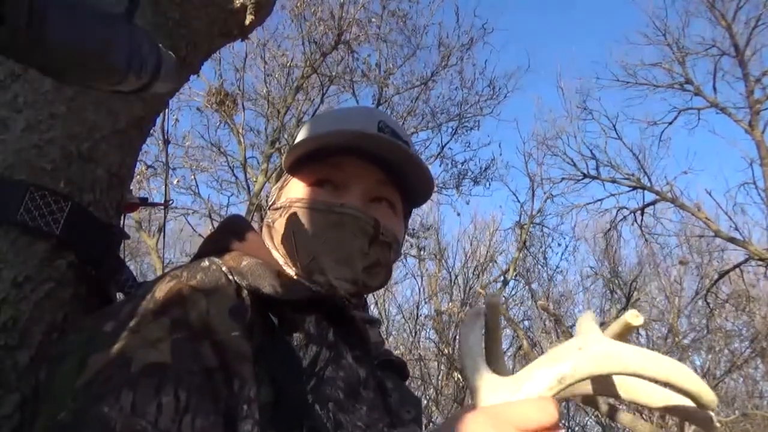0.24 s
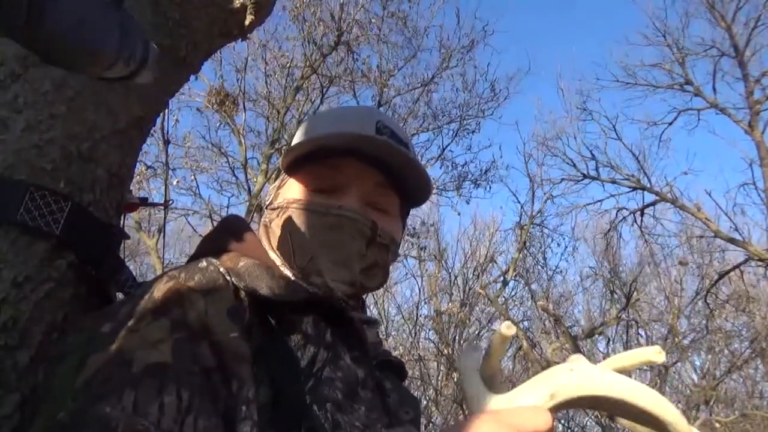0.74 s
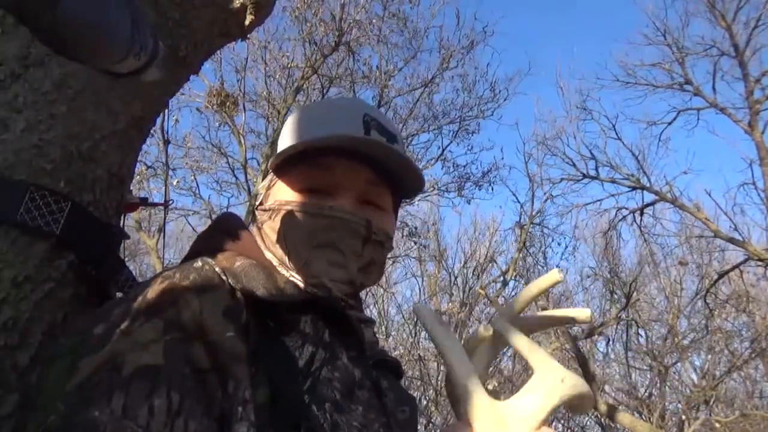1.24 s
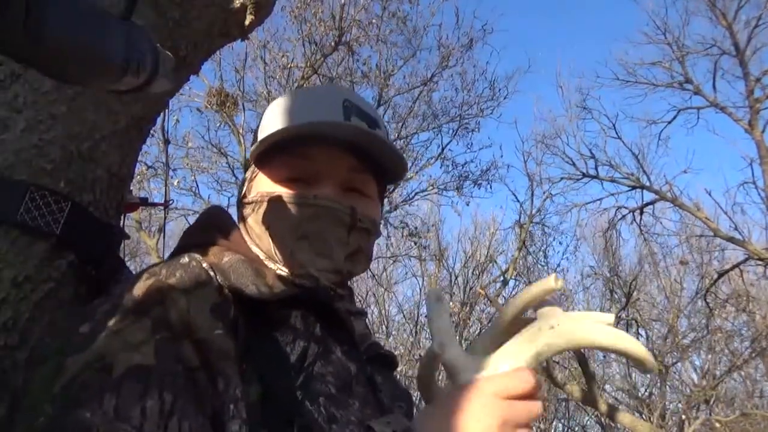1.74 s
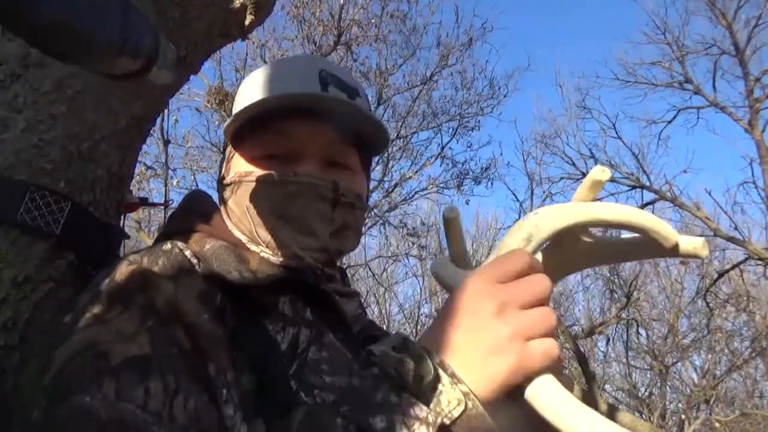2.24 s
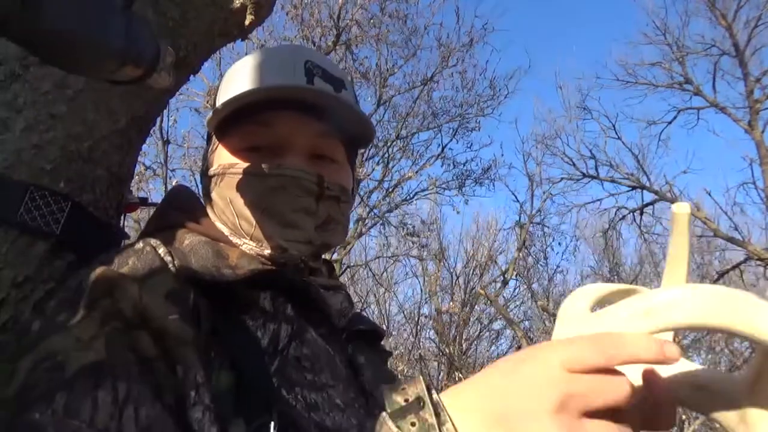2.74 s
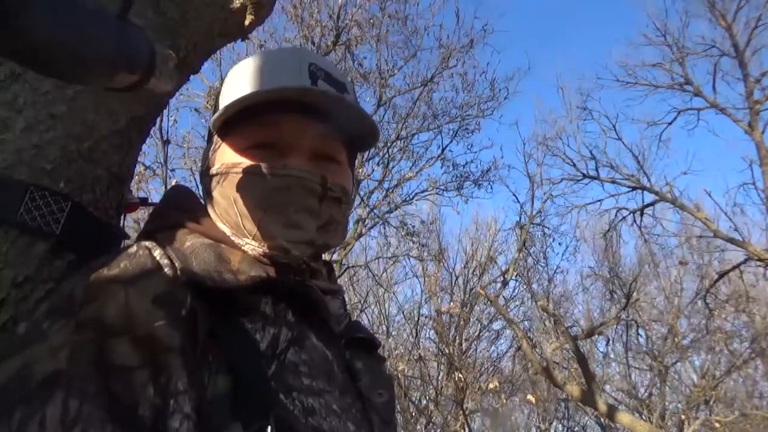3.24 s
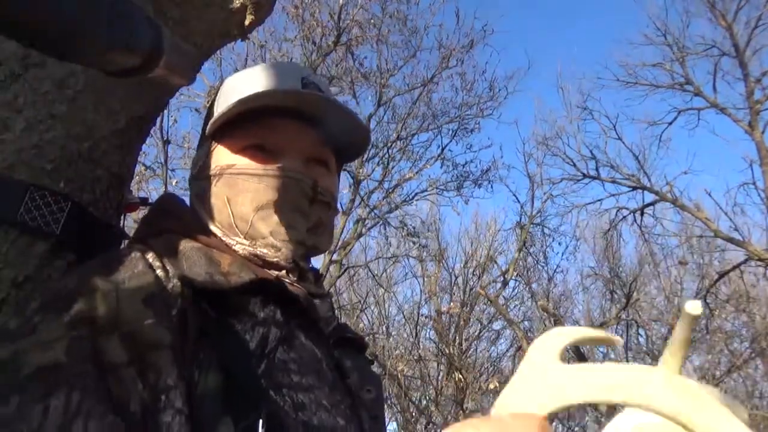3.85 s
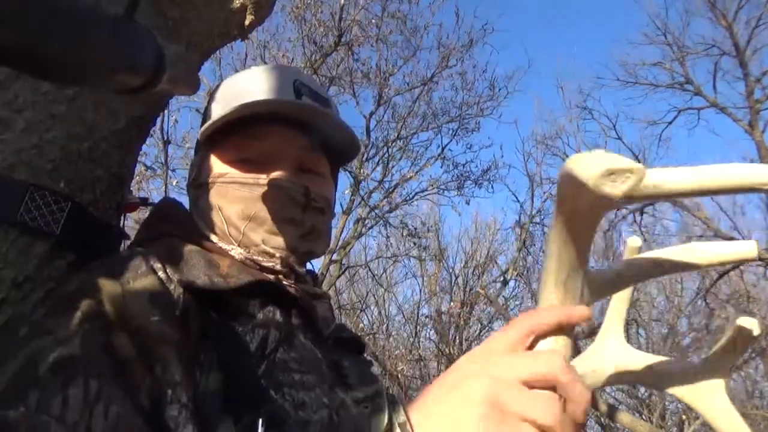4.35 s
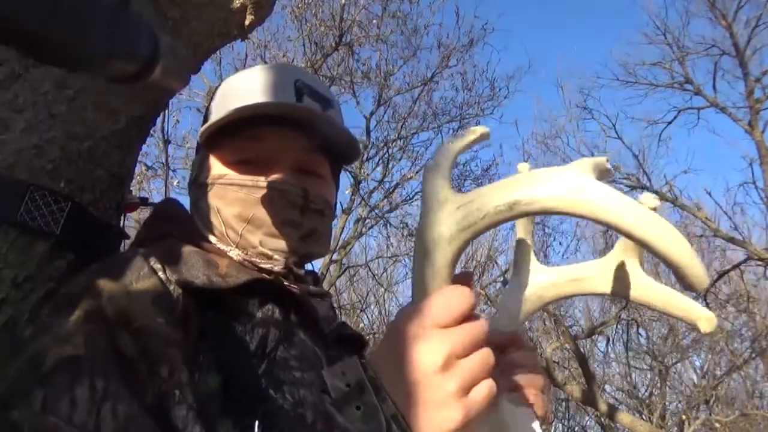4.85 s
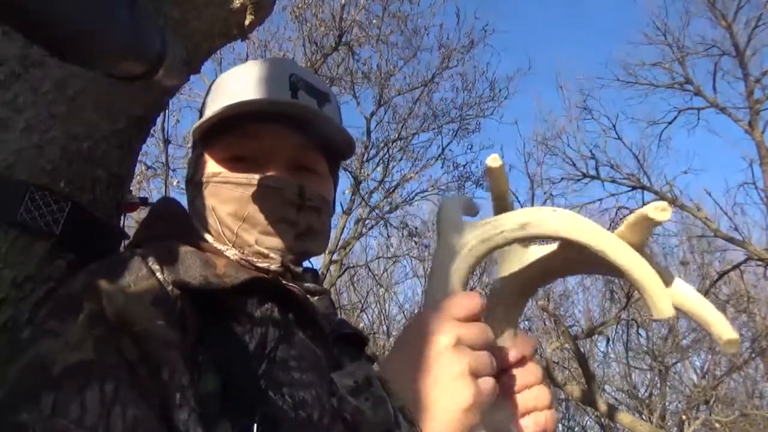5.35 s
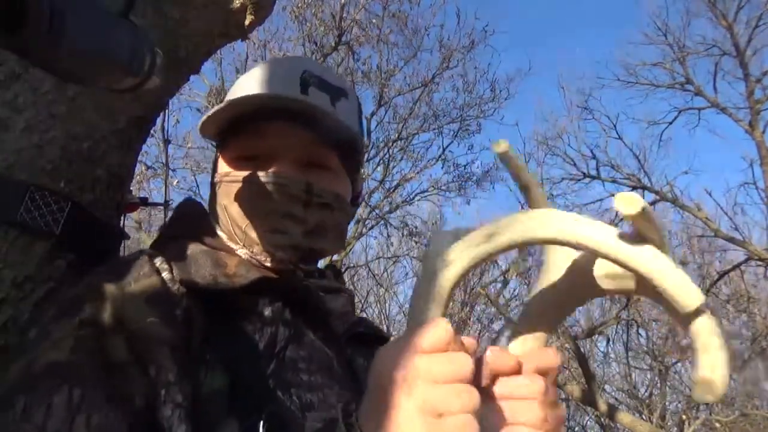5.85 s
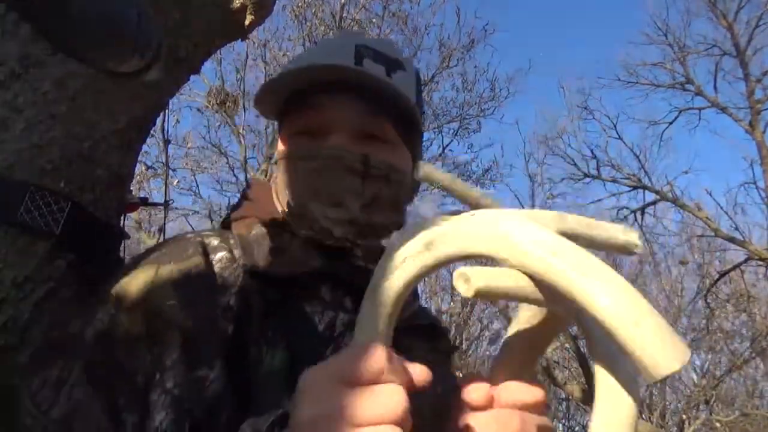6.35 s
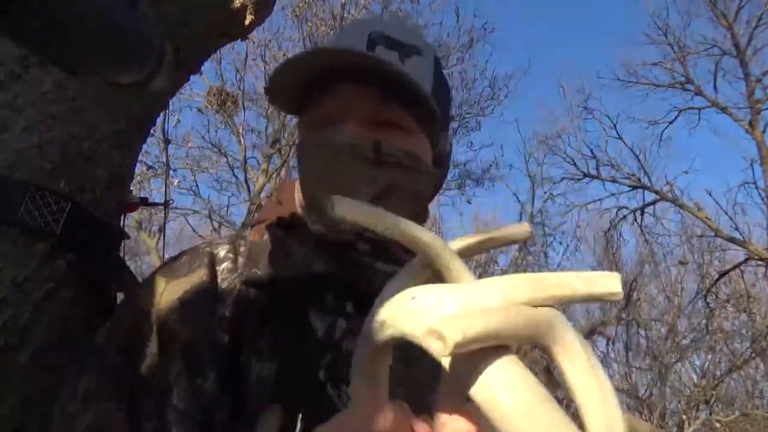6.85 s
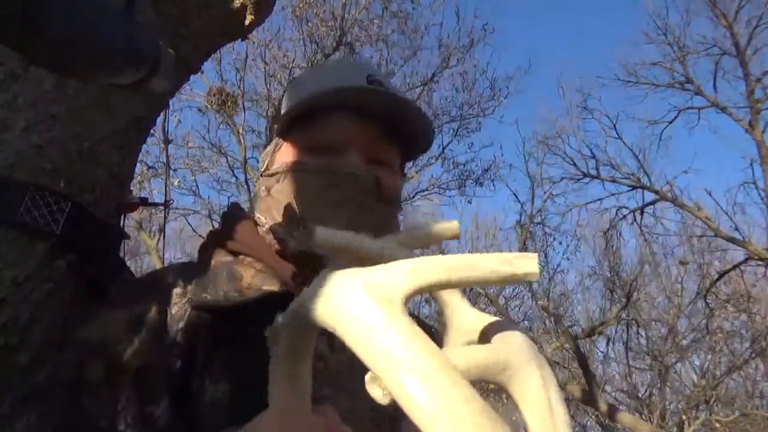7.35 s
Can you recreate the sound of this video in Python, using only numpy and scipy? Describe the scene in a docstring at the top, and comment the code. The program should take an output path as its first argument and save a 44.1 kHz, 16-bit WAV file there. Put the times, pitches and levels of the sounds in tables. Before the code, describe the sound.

Outdoors among bare trees, hard antlers strike with bright, dry, hollow clacks, slightly right of centre and very near. Contacts bounce in twos and threes, then in longer rattling runs, with brief rasps as the beams slide. Jacket cloth brushes quietly and air stirs faintly. The middle thins to small ticks, then the clashing returns strongly, with only a thin woodland tail.

```python
"""Soft air and a jacket sleeve come first, then a faint clack: two deer antlers, close to a stereo microphone
in a quiet winter wood. Clashed by hand, they ring as bending modes plus a short noise crack at each contact.
Volleys bounce out or are pressed on as the contact point slides; trains of tiny slips make the beams scrape.
Filtered noise gives the light ticks, the cloth and the air, and the trees' faint answer is a decaying noise tail.
The camera's limiter flattens the hardest blows."""
import sys
import numpy as np
from scipy import signal
from scipy.fft import rfft, irfft, next_fast_len
from scipy.io import wavfile
from scipy.ndimage import uniform_filter1d, minimum_filter1d, map_coordinates

SR = 44100
rng = np.random.default_rng(int(sys.argv[2]) if len(sys.argv) > 2 else 0)


def dump_mix(stems):
    """Bounce the given channels to the path in sys.argv[1] as a 16-bit WAV at rate SR."""
    frames = np.atleast_2d(stems).T  # one column per channel
    limited = np.clip(frames, -1, 1)  # hard clip at full scale
    pcm = np.round(limited * 32767).astype(np.int16)
    wavfile.write(sys.argv[1], SR, pcm)


N = 335601
TIME = np.arange(N) / SR
RING_TIME = np.arange(SR // 4) / SR

# Levels of events, sleeves and air are before the gain_db of their function.
# Low stir of air in the wood. Each row: time in seconds, level in dB.
AIR_LEVEL = [(0, -58), (.25, -65.5), (.9, -62), (1.3, -55.5), (1.6, -55), (2.05, -65), (2.9, -65),
             (3.05, -60.5), (3.85, -64), (3.96, -58.5), (4.1, -64.5), (7.61, -65)]
# Jacket sleeves. Each row: time in seconds, level in dB.
SLEEVE_LEVEL = [(0, -60), (1.8, -55.5), (2.1, -54.5), (3.2, -55.5), (3.7, -50), (4.2, -56), (5.55, -56),
                (5.85, -54), (6.5, -48), (6.78, -52), (7.61, -59.5)]
# Colour of the air. Each row: frequency in Hz, relative density in dB per Hz.
AIR_COLOUR = [(25, -15), (130, -4), (250, -4.5), (2000, -11.5), (8000, -24)]
# Colour of the cloth. Each row: frequency in Hz, relative density in dB per Hz.
CLOTH_COLOUR = [(100, -47), (400, 3.5), (1000, 4), (3000, 2.5), (5500, 2), (8000, 4.5), (10800, -4)]
# Bending modes of the pair. Each row: frequency in Hz, relative level in dB.
BENDING_MODES = [(350, -12), (431, -18), (624, -9.5), (802, -10), (915, -11.5), (1145, 0), (1335, -1),
                 (1529, -2.5), (1770, 4.5), (1845, -4), (2137, -0.5), (2315, 7.5), (2700, -2), (3040, 6.5),
                 (3400, 3.5), (3640, 9), (3828, 6.5), (4170, 10.5), (4480, 7.5), (4940, 2), (5460, 8.5),
                 (5950, 5), (6560, 3), (7210, 9.5), (7780, 5.5), (8500, -12.5), (9400, -19)]
# Each new hold leaves one low mode free to ring. Each row: start in seconds, free mode in Hz.
HOLDS = [(0, 936), (.9, 1246), (1.7, 1145), (2.1, 890), (2.6, 363), (3.5, 624), (5, 880), (6.7, 624)]
# Blows timed one by one, some alone, some in close pairs or just after a volley. Each row: start in seconds,
# level in dB, mode favoured by the contact point in Hz, beam knock in dB re level, tine snap in dB re level.
SINGLE_BLOWS = [(0.177, -46, 1620, -6, -17), (0.552, -25, 1560, -14, -13), (1.363, -26, 2800, -24, -14),
                (1.758, -20, 2610, -13.5, 0), (2.037, -19, 3010, -12, -39),
                (2.389, -15.5, 3290, -24.5, -44), (2.458, -42.5, 3130, -15, -16),
                (2.578, -37, 1650, -33, -28), (2.634, -34, 3000, -23, -5), (2.772, -33.5, 3000, -9, -20),
                (2.805, -21, 3100, -19.5, -30), (3.044, -39, 2090, -5, 7.5), (3.393, -42, 3100, -5.5, -16),
                (3.419, -34.5, 3020, -24, 1), (3.59, -31, 3500, -42, -0.5), (3.603, -30.5, 1630, -6, -3),
                (4.207, -18, 2870, -13.5, -42), (5.334, -33, 2740, -21, -30),
                (5.741, -34.5, 1930, -7.5, -12), (5.781, -37.5, 3190, -11, -15),
                (5.858, -23.5, 2530, -20, -14), (5.876, -17.5, 2010, -17, -14.5),
                (5.952, -28.5, 2140, -27, -18), (5.966, -21, 1840, -16, -26), (6.599, -33, 2270, -21, -11),
                (6.795, -18.5, 2400, -19, 1), (6.954, -22, 1944, -18, -13), (7.391, -30, 2580, -10.5, -9)]
# A clash rattles as a volley of contacts. Each row: first contact in seconds, last contact in seconds,
# number of contacts, level in dB, first favoured mode in Hz, last favoured mode in Hz,
# beam knock in dB re level, tine snap in dB re level.
CLASH_VOLLEYS = [(0.247, 0.305, 6, -38, 2300, 1510, -24, -21),
                 (0.483, 0.525, 3, -14, 4150, 3120, -19.5, -6.5),
                 (0.946, 0.968, 2, -16, 3020, 3280, -17.5, -37),
                 (1.201, 1.229, 3, -20.5, 3820, 2590, -18, -6), (1.325, 1.349, 2, -17, 4500, 4130, -35, -1),
                 (1.409, 1.429, 3, -18, 3920, 1710, -15.5, -8.5),
                 (1.569, 1.598, 3, -21, 2450, 2060, -20, -1.5),
                 (1.79, 1.857, 5, -17, 3460, 3150, -24.5, -3),
                 (2.18, 2.201, 3, -17.5, 3510, 2630, -14, -4.5),
                 (2.22, 2.277, 4, -16, 3130, 3340, -15.5, -11),
                 (2.7, 2.735, 3, -18, 2950, 3120, -20.5, -14),
                 (3.06, 3.084, 3, -22.5, 1550, 1840, -5, -7.5),
                 (5.156, 5.205, 5, -19.5, 3230, 2890, -18.5, -2.5),
                 (5.593, 5.676, 6, -18.5, 4200, 3010, -25, -0.5),
                 (6.024, 6.134, 9, -19.5, 4440, 2520, -32, -3.5),
                 (6.257, 6.332, 6, -18.5, 2880, 2450, -27, -4.5),
                 (6.823, 6.869, 4, -10.5, 4460, 1920, -24.5, -3),
                 (7.207, 7.303, 7, -16, 1960, 2340, -20.5, -4)]
# One knobbly beam slides along the other. Each row: start in seconds, end in seconds, level in dB,
# centre of the rasp in Hz.
BEAM_SCRAPES = [(0.262, 0.399, -46.5, 3020), (0.411, 0.51, -37, 3170), (0.488, 0.567, -28, 1590),
                (0.634, 0.636, -41, 1240), (0.894, 0.937, -47, 3000), (0.974, 1.001, -30.5, 3200),
                (1.255, 1.288, -45, 2200), (1.372, 1.401, -33, 2720), (1.439, 1.524, -31.5, 1980),
                (1.763, 1.896, -27, 1620), (1.903, 2.002, -39.5, 3330), (2.292, 2.435, -36.5, 1930),
                (2.607, 2.67, -44, 1750), (3.084, 3.122, -38.5, 1150), (3.091, 3.157, -44.5, 377),
                (3.452, 3.489, -35.5, 3210), (5.378, 5.452, -45, 8000), (5.826, 5.929, -35, 1940),
                (5.971, 6.005, -39, 1930), (6.141, 6.157, -31.5, 3070), (6.402, 6.48, -45.5, 2200),
                (6.592, 6.627, -33.5, 1680), (6.858, 6.893, -24.5, 2300)]
# How long the trees answer. Each row: frequency in Hz, time to fall 60 dB in seconds.
WOODS_DECAY = [(200, 0.18), (3000, 0.75), (10000, 0.48)]
# Light dry ticks. Each row: start in seconds, level in dB.
LIGHT_TICKS = [(2.921, -31), (3.749, -30), (3.814, -27), (3.827, -37), (3.87, -36), (4.868, -30),
               (4.894, -41), (4.901, -28.5), (4.946, -34), (4.961, -27.5), (5.013, -37.5), (5.047, -40.5)]
# Colour of the ticks. Each row: frequency in Hz, relative density in dB per Hz.
TICK_NOISE_COLOUR = [(200, -6), (1000, 0.5), (8000, 21)]

# The beams knock below the first pitch, the tines snap above the second.
KNOCK_HZ, SNAP_HZ = 1400, 4700
# A blow with more knock than usual also drives the modes up to TINE_HZ (spill in dB per dB of extra knock).
USUAL_KNOCK_DB, KNOCK_SPILL, TINE_HZ = -25, 0.42, 2330
# Up to LOOSE_COUNT contacts bounce freely, more are pressed on.
# Each pair: pace (under 1 the gaps shrink), loss by the last contact in dB.
LOOSE_COUNT = 3
LOOSE, PRESSED = (0.8, 5.7), (1.05, 3.14)
# Scatter of the inner contacts: share of an even gap, dB, share of the pitch.
UNEVEN_GAP, UNEVEN_DB, UNEVEN_SPOT = 0.14, 0.3, 0.11
SNAP_FALL_DB = 8.5  # over a volley, as the contact slides from the tines to the beams
TOP_HZ = 10950  # top of the recorded band


def amp(db):
    """Decibels to gain."""
    return 10 ** (np.asarray(db) / 20)


def unit(x):
    """Scale to rms 1."""
    return x / np.sqrt(np.mean(x ** 2) + 1e-20)


def along(points, hz):
    """Read (Hz, value) points on a log frequency axis."""
    point_hz, value = np.transpose(points)
    return np.interp(np.log(hz + 1), np.log(point_hz), value)


def filtered(x, response):
    """x times a response of frequency, padded so that the end does not wrap round."""
    size = x.shape[-1]
    padded = next_fast_len(size + 4096)
    spectrum = rfft(x, padded) * response(np.fft.rfftfreq(padded, 1 / SR))
    return irfft(spectrum, padded)[..., :size]


def two_ports(size, width):
    """Random values for left and right: a shared part and a part of opposite sign."""
    mid, side = rng.standard_normal((2, size))
    return np.array([mid + width * side, mid - width * side])


def noise(colour, size, width):
    """Coloured stereo noise of rms 1."""
    return unit(filtered(two_ports(size, width), lambda hz: amp(along(colour, hz))))


def wobble(rate):
    """A smooth random curve, rate knots a second."""
    knots = rng.standard_normal(int(N * rate / SR) + 4)
    return map_coordinates(knots, [TIME * rate])


def add(track, s, sound):
    """Mix a sound into a track at time s."""
    part = track[:, max(round(s * SR), 0):]
    part[:, :sound.shape[1]] += sound[:, :part.shape[1]]


def breeze(gain_db=1, flutter_db=4.55):
    """Light air rumbles softly round the tree: dark noise whose level wanders slowly."""
    level_db = np.interp(TIME, *np.transpose(AIR_LEVEL))
    return amp(level_db + gain_db + flutter_db * wobble(4.46)) * noise(AIR_COLOUR, N, width=0.32)


def jacket(gain_db=4, flutter_db=1.57):
    """Sleeves brush the body as the arms move: noise with a quick flutter."""
    level_db = np.interp(TIME, *np.transpose(SLEEVE_LEVEL))
    return amp(level_db + gain_db + flutter_db * wobble(45)) * noise(CLOTH_COLOUR, N, width=0.33)


def grip(free_hz, free_db=11, detune=0.014, scatter_db=5.0):
    """The modes (Hz, dB) under one hold: the hands shift and damp each differently, sparing the free one."""
    hz, db = np.transpose(BENDING_MODES)
    shift, damp = rng.standard_normal((2, len(hz)))
    free = np.exp(-.5 * (np.log(hz / free_hz) / 0.044) ** 2)
    held_hz = hz * (1 + detune * shift * (1 - free))
    held_db = db + scatter_db * damp * (1 - free) + free_db * free
    return held_hz, held_db


def held(grips, s):
    """The modes of the hold in use at time s."""
    return grips[max(np.searchsorted(np.transpose(HOLDS)[0], s) - 1, 0)]


def contacts():
    """Every contact, single or in a volley; along a volley blows weaken and lose snap as the contact slides."""
    rows = list(SINGLE_BLOWS)
    for first, last, count, db, first_hz, last_hz, knock_db, snap_db in CLASH_VOLLEYS:
        pace, loss_db = LOOSE if count <= LOOSE_COUNT else PRESSED
        # the first and last contacts are not scattered
        early, force, spot = np.pad(rng.standard_normal((3, count - 2)), ((0, 0), (1, 1)))
        even = (np.arange(count) + UNEVEN_GAP * early) / (count - 1)
        way = np.clip(even, 0, 1) ** pace
        starts = first + (last - first) * way
        levels_db = db - loss_db * way ** 2 + UNEVEN_DB * force
        favoured_hz = first_hz * (last_hz / first_hz) ** way * np.exp(UNEVEN_SPOT * spot)
        rows += zip(starts, levels_db, favoured_hz, np.full(count, knock_db), snap_db - SNAP_FALL_DB * way)
    return rows


def knocked(modes, knock_db):
    """The modes (Hz, dB) as one blow meets them: on the beam it drives the lower ones, on a tine it spares them."""
    hz, db = modes
    low_share = np.interp(hz, [KNOCK_HZ, TINE_HZ], [1, 0])
    return hz, db + KNOCK_SPILL * (knock_db - USUAL_KNOCK_DB) * low_share


def ring(modes, favoured_hz, favour_db, reach, t60_1khz=0.13, damping=1.0, scatter_db=3.5, detune=0.02,
         uneven=0.22):
    """The modes after one contact, (channels, modes, time); higher ones die sooner in the gripped bone."""
    hz, db = modes
    level_chance, pitch_chance, sign_chance, damp_chance = rng.standard_normal((4, len(hz)))
    favour = np.exp(-.5 * (np.log(hz / favoured_hz) / reach) ** 2)
    db = db + scatter_db * level_chance + favour_db * favour
    hz = hz * (1 + detune * pitch_chance * hz / SNAP_HZ)  # contact loads light tines more than the heavy beam
    t60 = t60_1khz * (hz / 1000) ** -damping  # seconds, before the two losses below
    t60 = t60 / (1 + (430 / hz) ** 6)  # the hands soak up the lowest modes
    t60 = t60 * np.exp(-uneven * np.abs(damp_chance))  # the touching antler damps each mode by chance
    fade = np.exp(-np.log(1000) * np.outer(1 / t60, RING_TIME).astype(np.float32))
    waves = fade * np.sin(2 * np.pi * np.outer(hz, RING_TIME).astype(np.float32))
    balance = 1 + .18 * np.outer([1, -1], rng.standard_normal(len(hz)))  # each mode leans left or right
    gains = amp(db) * np.sign(sign_chance) * balance
    return gains.astype(np.float32)[:, :, None] * waves


def head_unit(x):
    """Scale a blow to rms 1 over its first 8 ms."""
    head = int(.008 * SR)
    return x / np.sqrt(np.mean(x[:, :head] ** 2) + 1e-20)


def later(x, s):
    """The same sound s seconds later, cut to the ring length."""
    return np.pad(x, ((0, 0), (int(s * SR), 0)))[:, :len(RING_TIME)]


def clacks(grips, crack_db=-4, crack_t60=0.019, chatter=0.22, rebound=0.52, gain_db=1):
    """Each blow rings the modes and cracks at the contact; it chatters at once, then rebounds lightly."""
    out = np.zeros((2, N))
    zone = np.digitize(np.transpose(BENDING_MODES)[0], [KNOCK_HZ, SNAP_HZ])
    edges = [(580, KNOCK_HZ), (KNOCK_HZ, SNAP_HZ), (SNAP_HZ, 9500)]  # Hz: knock, clack, snap
    bands = [signal.butter(2, edge, 'band', fs=SR, output='sos') for edge in edges]
    for s, db, favoured_hz, knock_db, snap_db in contacts():
        modes = ring(knocked(held(grips, s), knock_db), favoured_hz, favour_db=18, reach=0.069)
        crack = two_ports(len(RING_TIME), width=0.28) * amp(-60 * RING_TIME / crack_t60)
        # delays in seconds, then the share of the rebound
        chatter_s, rebound_s, lift = rng.uniform([.001, .006, 0], [.003, .014, 1])
        for k, part_db in enumerate([knock_db, 0, snap_db]):
            tone = head_unit(modes[:, zone == k].sum(axis=1))
            part = tone + amp(crack_db) * head_unit(signal.sosfilt(bands[k], crack))
            part = part + chatter * later(part, chatter_s) + rebound * lift * later(part, rebound_s)
            add(out, s, amp(db + part_db + gain_db) * head_unit(part))
    return out


def slips(size, db):
    """Ridges catch and let go at an uneven pace: single ticks under light pressure, a rasp under heavy."""
    pace, force = rng.standard_normal((2, len(RING_TIME)))[:, :size]
    held_pace = np.repeat(np.clip(pace, -1.5, 1.5), 256)[:len(force)]  # a new pace every 256 samples
    slips_per_s = 170 * amp((db + 33) / 2 + 7 * held_pace)
    ridge = np.floor(np.cumsum(slips_per_s) / SR)
    blows = np.diff(ridge, prepend=-1) * amp(4.5 * np.clip(force, -2, 2))
    blows = blows + .028 * pace  # fine grain between the ridges
    return blows * signal.windows.tukey(len(blows), .2)


def scrapes(grips, grit_db=-9, reach=1.25, gain_db=0, count=5):
    """Every slip is a tiny blow at one of count spots; pressed together, the beams ring only briefly."""
    out = np.zeros((2, N))
    for start, end, db, centre_hz in BEAM_SCRAPES:
        blows = slips(max(int((end - start) * SR), SR // 100), db)
        spots = rng.integers(count, size=len(RING_TIME))[:len(blows)]
        sound = 0
        for spot in range(count):
            grit = two_ports(len(RING_TIME), width=0.46) * amp(-60 * RING_TIME / 0.01)
            modes = ring(held(grips, start), centre_hz, favour_db=14, reach=0.06, t60_1khz=0.094, detune=0.038)
            answer = unit(modes.sum(axis=1)) + amp(grit_db) * unit(grit)
            sound = sound + signal.fftconvolve([blows * (spots == spot)], answer, axes=1)
        # the size of the ridges sets which band they drive
        sound = filtered(sound, lambda hz: 1 / (1 + (np.log((hz + 1) / centre_hz) / reach) ** 2))
        strength = np.sqrt(np.sum(sound ** 2) / (2 * len(blows)) + 1e-20)
        add(out, start, amp(db + gain_db) * sound / strength)
    return out


def radiated(x):
    """Slim beams move too little air to give bass, and bone is too soft for the highest treble."""
    return signal.sosfilt(signal.butter(4, [390, 10300], 'band', fs=SR, output='sos'), x)


def woods(x):
    """Trunks and branches scatter a thin tail back: noise that dies at its own rate in each band."""
    hz, t, z = signal.stft(two_ports(SR, width=0.4), SR, nperseg=256)
    fade = amp(-60 * t / along(WOODS_DECAY, hz)[:, None])
    tail = signal.istft(z * fade, SR, nperseg=256)[1]
    return signal.fftconvolve(x, tail / np.linalg.norm(tail[0]), axes=1)[:, :N]


def ticks(t60=0.015, gain_db=10):
    """Short bright ticks while the grip is changed: bursts of treble noise that die at once."""
    out = np.zeros((2, N))
    t = RING_TIME[:SR // 20]
    for s, db in LIGHT_TICKS:
        add(out, s, amp(db + gain_db - 60 * t / t60) * noise(TICK_NOISE_COLOUR, len(t), width=0.11))
    return out


def scene(woods_db=-27):
    """Clacks and scrapes sit slightly to the right, ticks in the middle, over cloth and air."""
    grips = [grip(free_hz) for _, free_hz in HOLDS]
    lean = amp([[-.85], [.85]])  # dB, left and right
    antlers = radiated(clacks(grips) + scrapes(grips)) * lean + ticks()
    return antlers + amp(woods_db) * woods(antlers) + jacket() + breeze()


def record(dry):
    """The camera's fast limiter holds the peaks at -4.2 dB; the top of the band is then cut steeply."""
    needed = np.minimum(1, amp(-4.2) / (np.abs(dry).max(axis=0) + 1e-9))
    gain = uniform_filter1d(minimum_filter1d(needed, size=67), size=45)  # samples
    return filtered(dry * gain, lambda hz: 1 / np.sqrt(1 + (hz / TOP_HZ) ** 160))


dry = scene()
out = record(dry)
dump_mix(out)
```